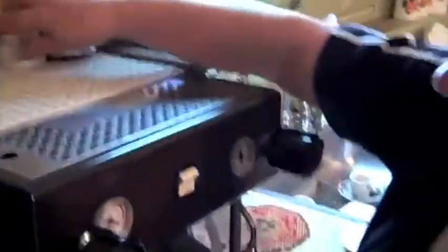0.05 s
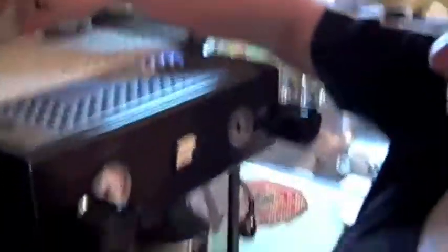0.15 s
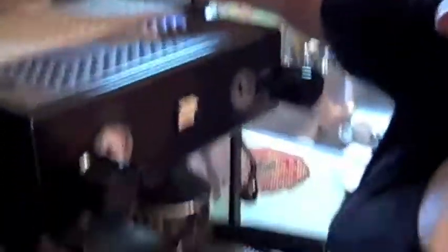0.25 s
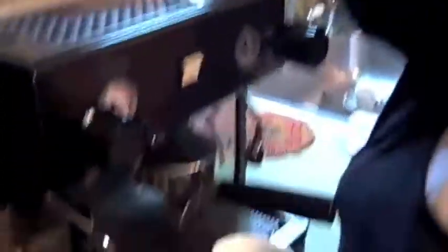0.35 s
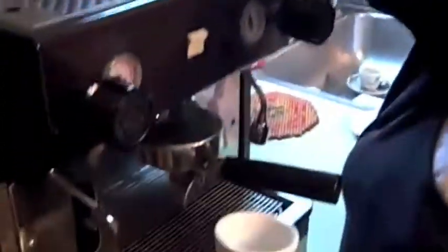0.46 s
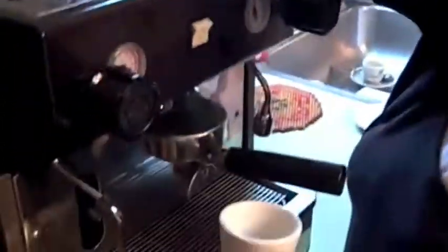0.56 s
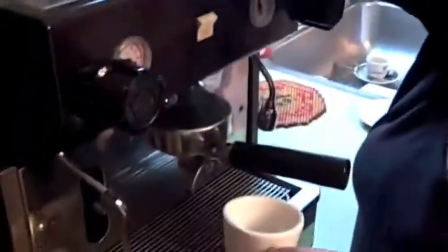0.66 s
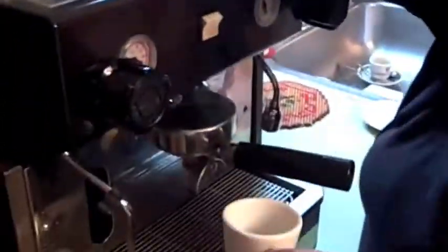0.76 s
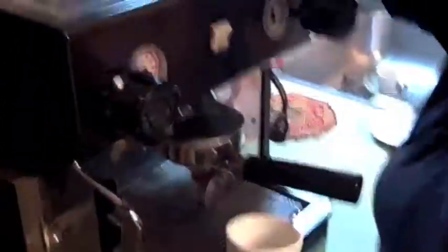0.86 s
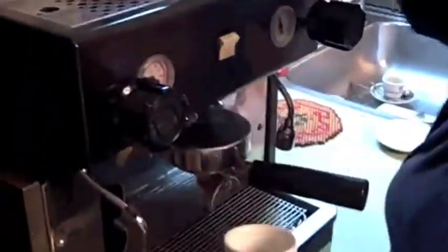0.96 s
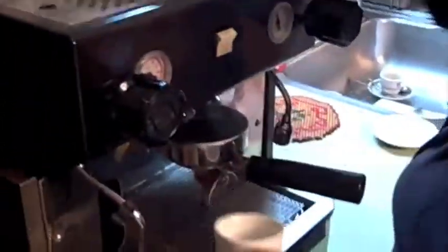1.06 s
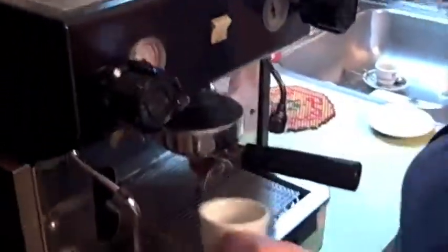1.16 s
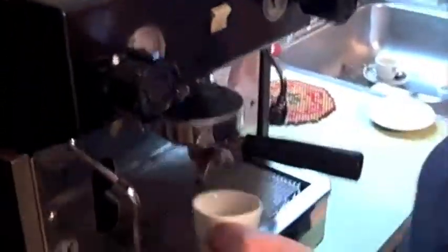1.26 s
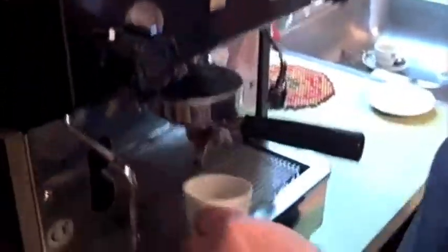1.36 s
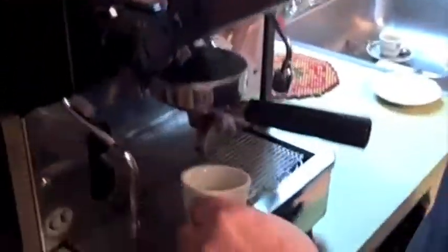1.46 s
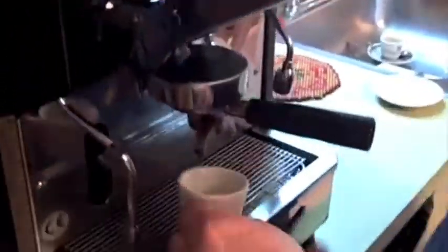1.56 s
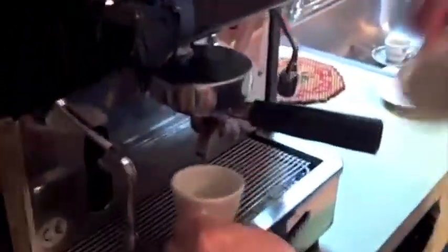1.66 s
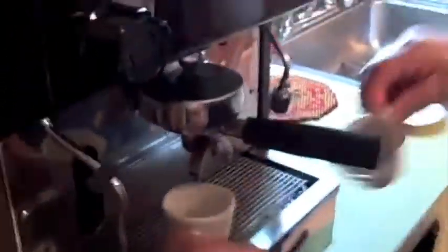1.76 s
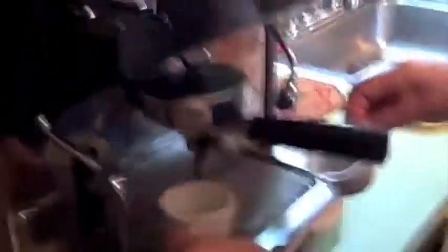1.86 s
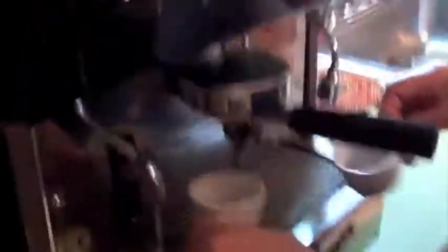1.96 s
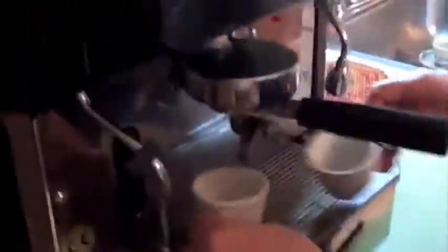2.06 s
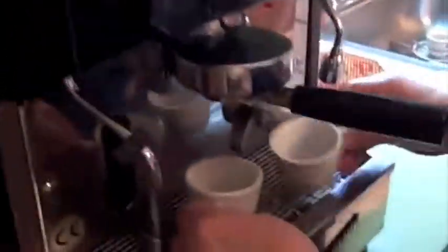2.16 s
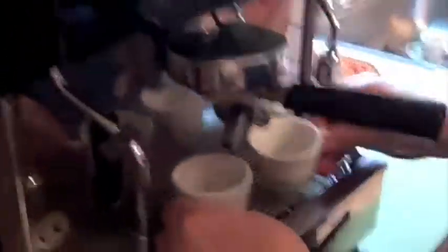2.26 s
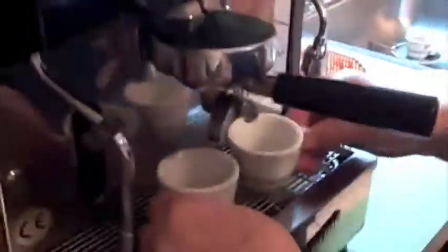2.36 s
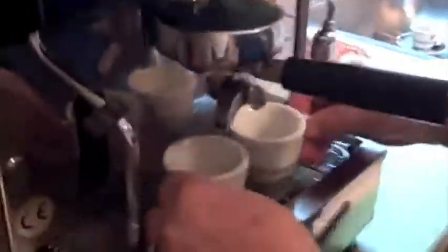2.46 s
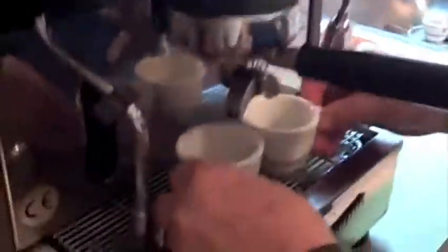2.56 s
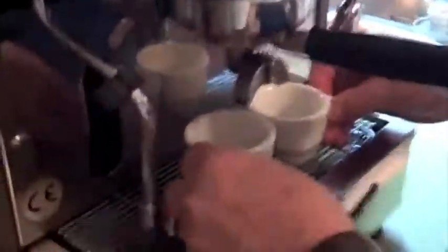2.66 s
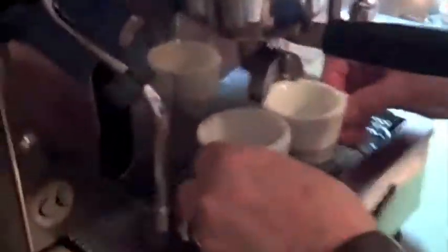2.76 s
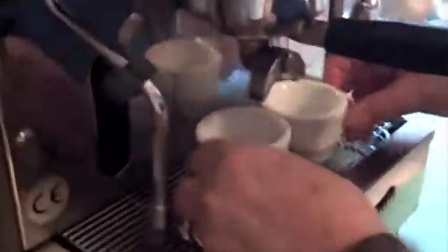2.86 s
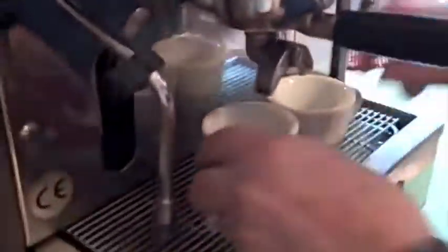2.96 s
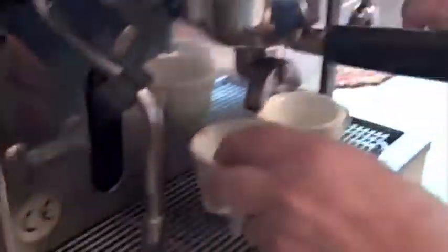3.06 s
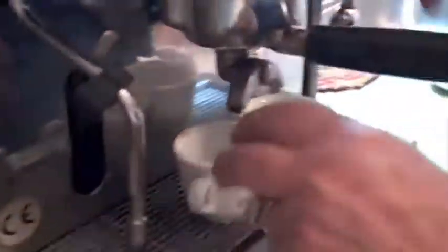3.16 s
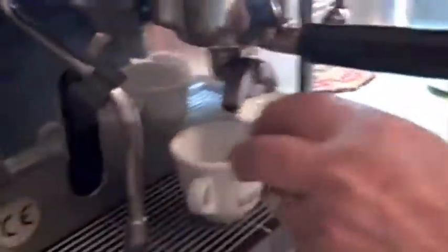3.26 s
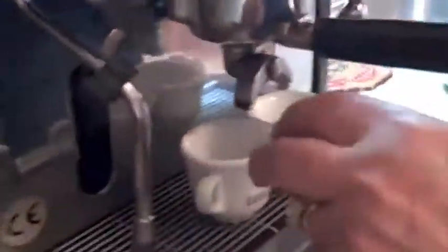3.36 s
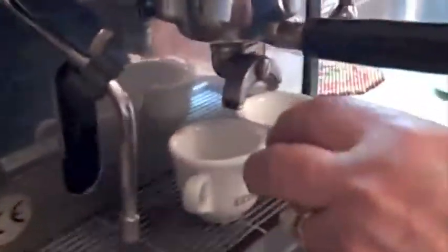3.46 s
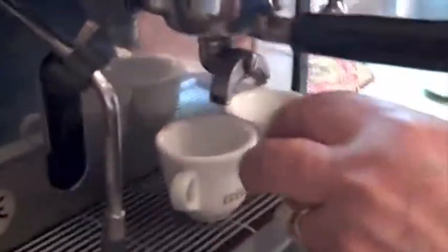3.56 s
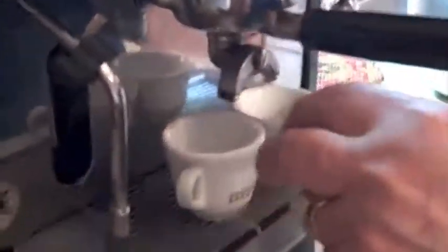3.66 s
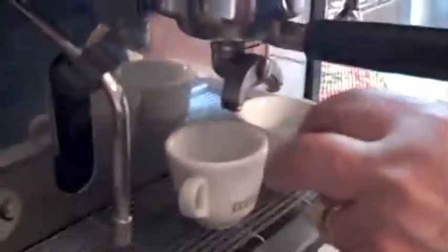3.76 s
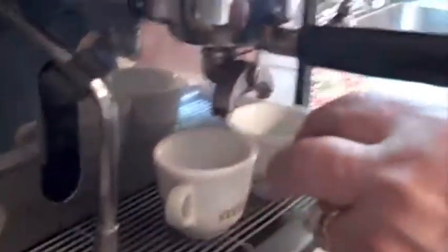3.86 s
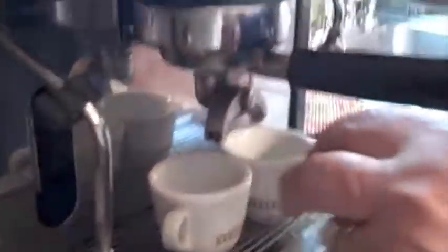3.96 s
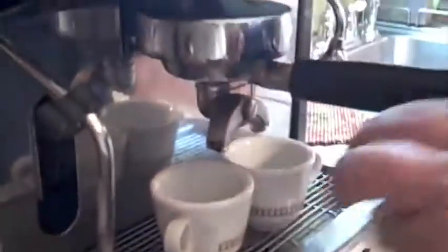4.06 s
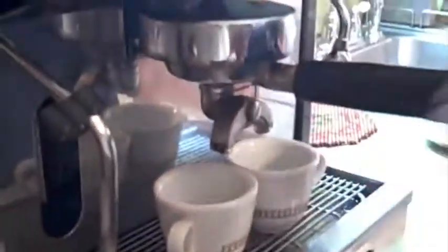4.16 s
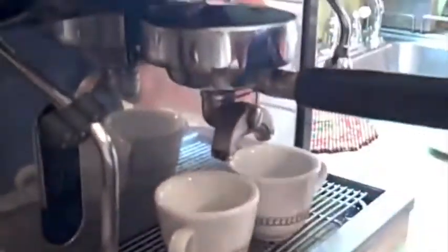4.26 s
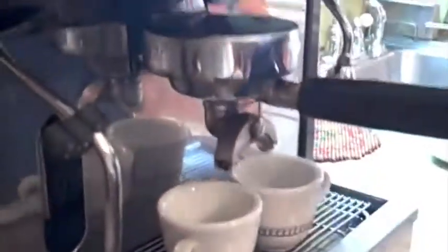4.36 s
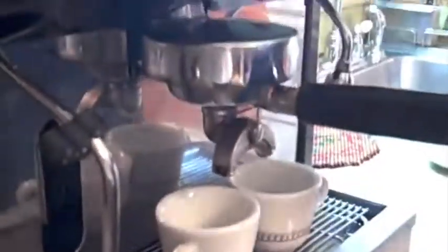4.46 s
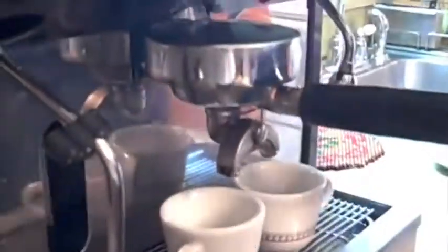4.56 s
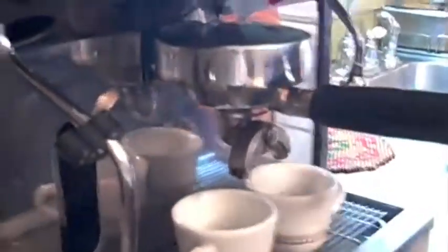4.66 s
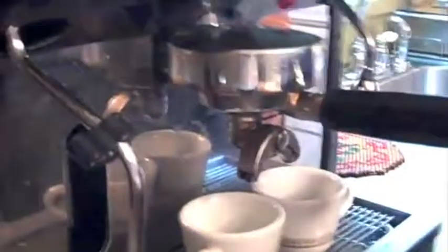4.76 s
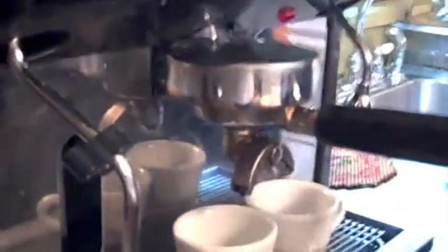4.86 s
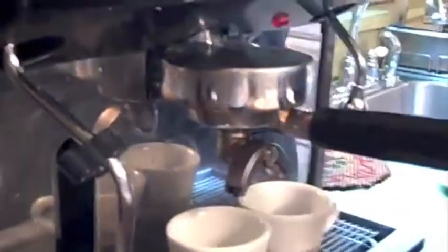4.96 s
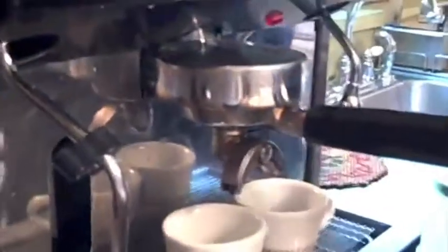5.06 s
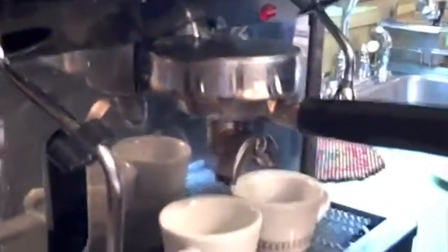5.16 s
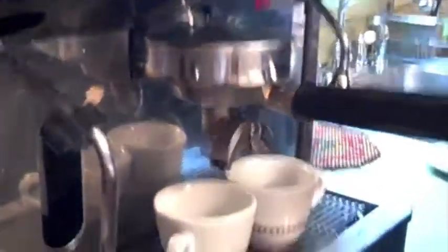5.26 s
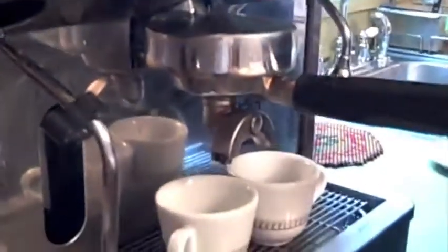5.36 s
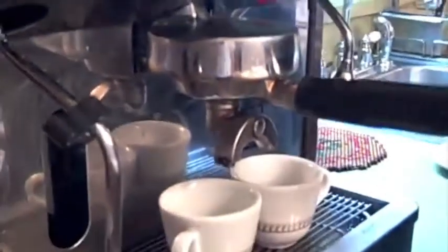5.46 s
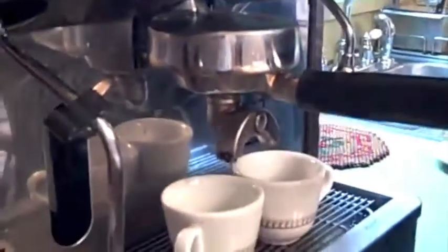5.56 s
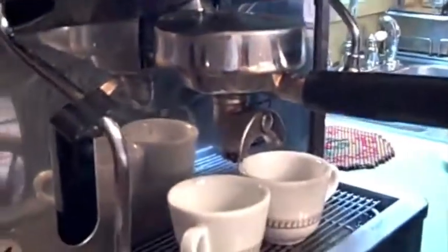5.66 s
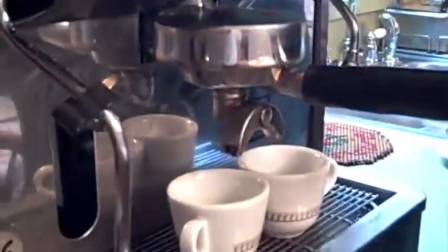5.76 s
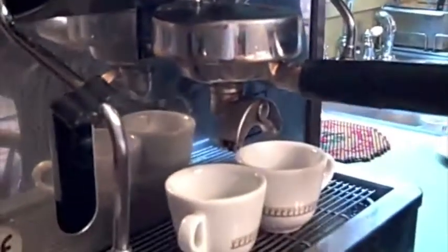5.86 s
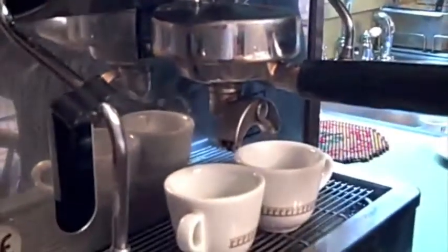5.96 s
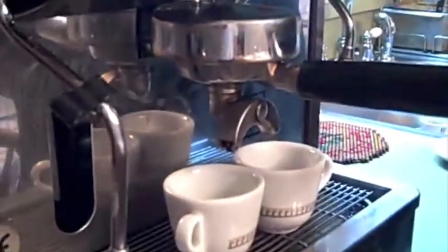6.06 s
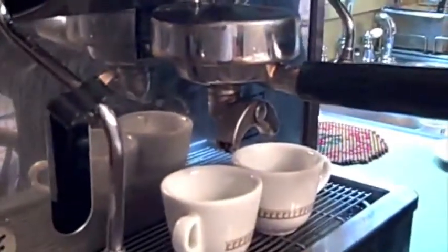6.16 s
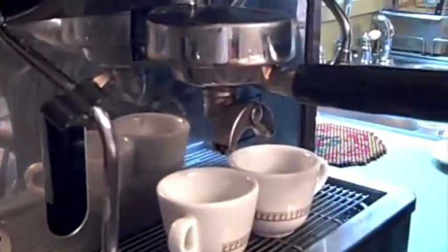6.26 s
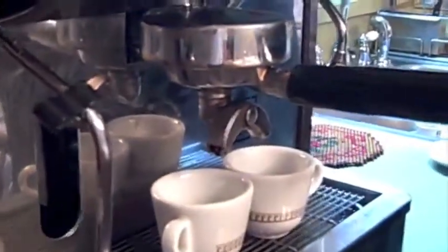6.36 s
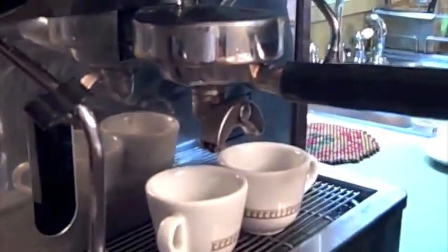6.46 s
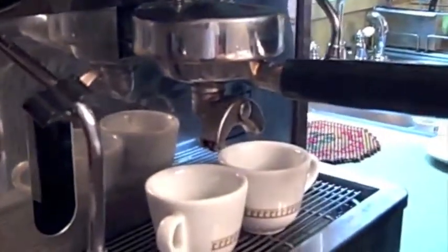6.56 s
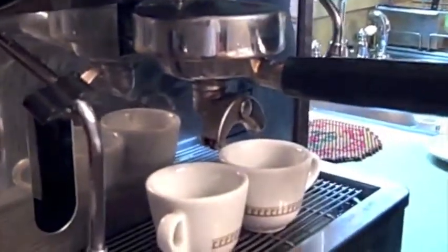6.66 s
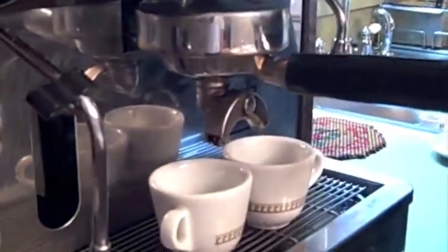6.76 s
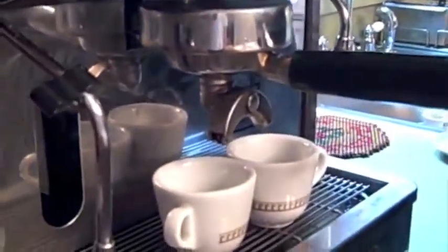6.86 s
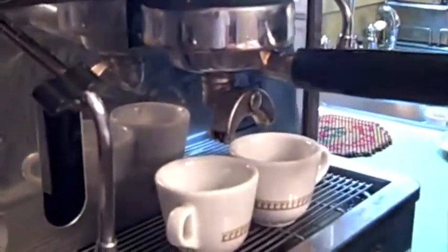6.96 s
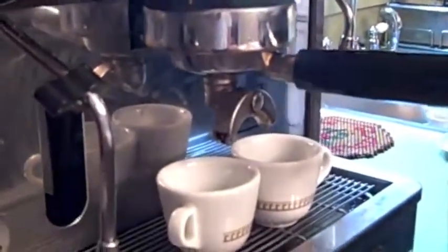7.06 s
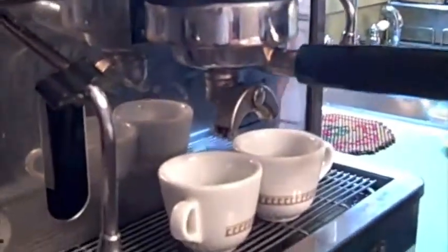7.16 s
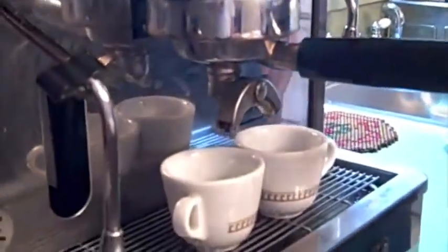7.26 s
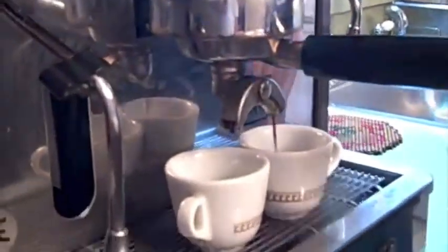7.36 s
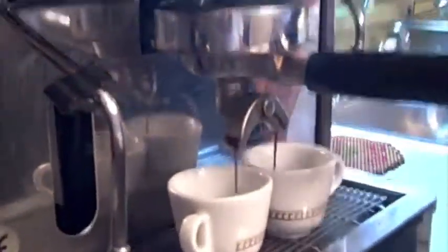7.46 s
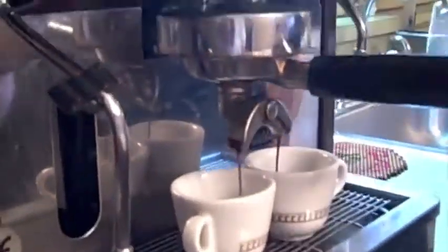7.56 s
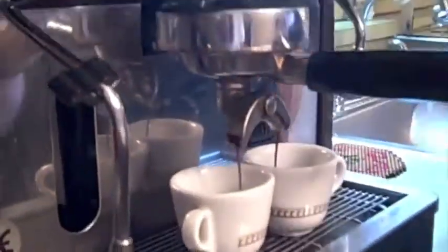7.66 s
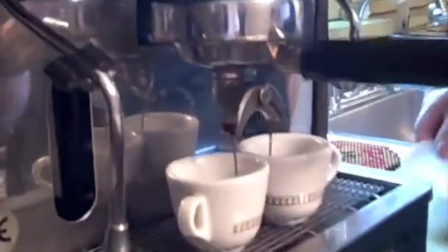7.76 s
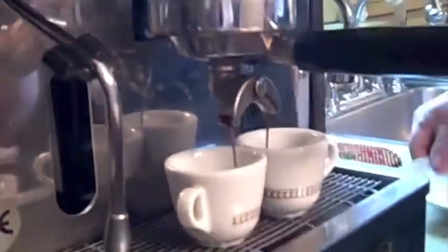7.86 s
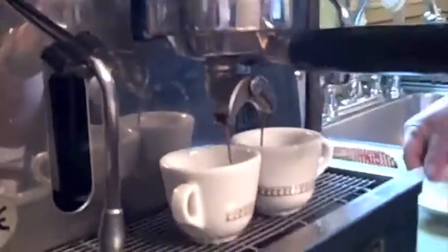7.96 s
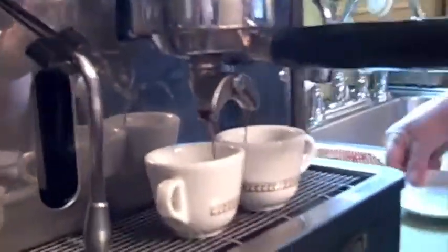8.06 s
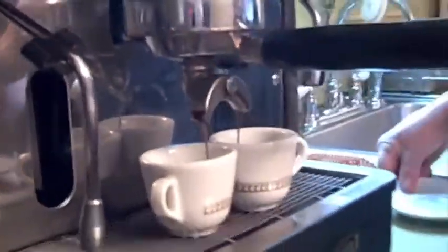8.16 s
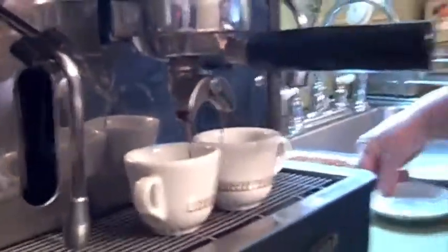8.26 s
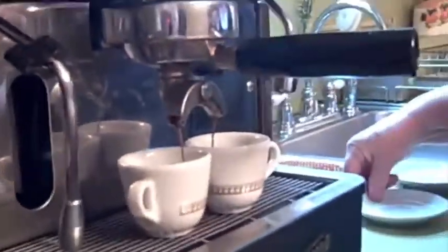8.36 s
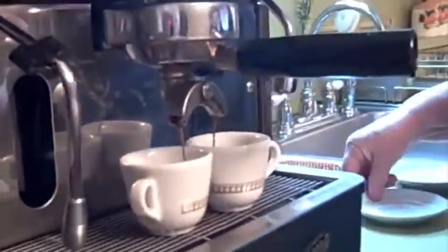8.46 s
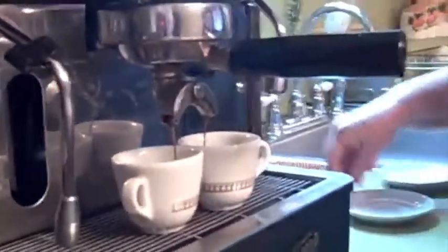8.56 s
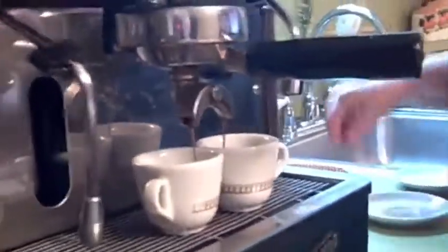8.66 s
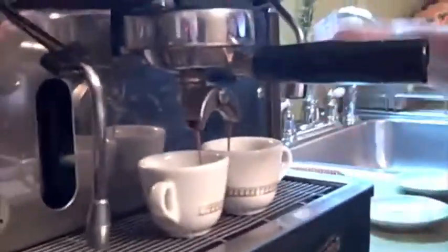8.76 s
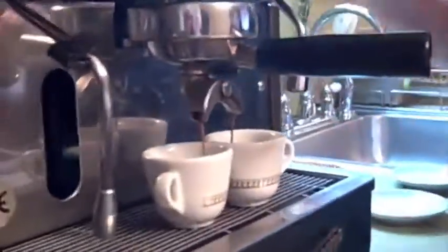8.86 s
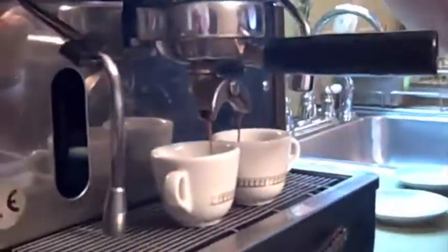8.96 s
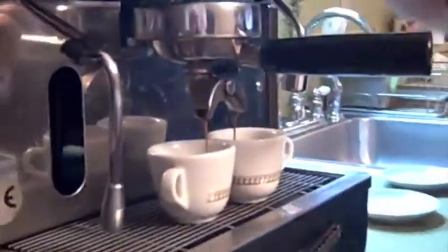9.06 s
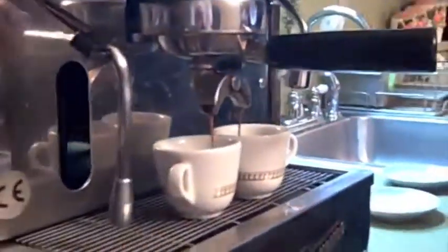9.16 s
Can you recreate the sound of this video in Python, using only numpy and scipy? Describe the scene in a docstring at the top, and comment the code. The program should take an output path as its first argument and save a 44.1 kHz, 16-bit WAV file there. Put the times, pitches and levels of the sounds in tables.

```python
"""Espresso machine and cups in a small kitchen

Close to a hand-held camera, two cups clink and scrape onto a steel drip tray: struck modes and rubbing noise.
A valve clacks open and a vane pump hums in harmonics of its vane rate while filtered noise hisses in as water.
The valve squeals and slams, the pump labours on against the coffee with a throbbing hiss, and two saucers
land on the counter. The camera's gain control ducks on sharp, bright blows, so the pump swells back after them."""
import sys
import numpy as np
from scipy import signal
from scipy.fft import rfft, irfft, next_fast_len
from scipy.io import wavfile
from scipy.ndimage import uniform_filter1d, minimum_filter1d

SR = 44100
rng = np.random.default_rng(int(sys.argv[2]) if len(sys.argv) > 2 else 0)


def unload_audio(sound):
    """Save the sound as a 16-bit wav file, at the path given as the first command line argument."""
    columns = np.transpose(np.atleast_2d(sound))
    # keep every value between -1 and 1, then stretch to whole-number steps
    steps = np.round(np.clip(columns, -1, 1) * 32767)
    wavfile.write(sys.argv[1], SR, steps.astype(np.int16))


N = 407043
T = np.arange(N) / SR
RING = SR * 3 // 4  # longest ring of a struck object, samples

# Levels are those at the microphone, ahead of the camera's gain control.
# A fade_s is the time to die by 60 dB; for blows it holds at 1 kHz.

# hum of the pump: multiple of the vane rate, level_db
VANE_ORDERS = [(1, -26), (2, -20), (3, -11), (4, 1.5), (5, -7.5), (6, -8), (7, -12.5), (8, -22), (9, -13.5),
               (10, -14.5), (12, -22), (13, -18)]
# the hum's overtones swell and fade as the microphone moves through standing waves:
# multiple of the vane rate -> time_s, level_db
STANDING_WAVES = {5: [(4.0, -2), (4.4, -6), (5.05, 5.5), (5.9, -3), (6.35, -2), (6.7, 7.5), (7.3, 1),
                  (7.9, 0), (8.7, -18), (9.2, -20)], 6: [(4.0, 0.5), (5.0, -1), (5.5, -14), (5.8, 7.5),
                  (6.15, -6), (6.7, 3), (7.4, 2), (9.2, 0.5)], 7: [(4.1, 5), (4.8, 3.5), (5.8, -13),
                  (6.7, 6), (7.3, 4), (7.9, -11), (9.2, 2)]}
# steady buzz of the motor: pitch_hz, level_db
MOTOR_LINES = [(118.5, -62.5), (1176, -57)]
# tone of the churning water and the rattle: frequency_hz, level_db
CHURN_COLOUR = [(60, -25), (270, -15), (350, -1), (430, 9.5), (520, -1.5), (650, 4.5), (850, 3),
                (1100, -2.5), (1500, -4.5), (2300, -8.5), (3200, -10), (6000, -29)]
# how hard the pump works, most while it fills the empty pipes: time_s, effort_db
EFFORT = [(4.05, 8.5), (4.35, 5.5), (4.72, 0.5), (5.0, -1), (5.5, 0.5), (5.9, -2), (6.4, -0.5), (7.3, 0.5),
          (9.23, -1.1)]
# pump shaft (turns per second): running free, slowed by the coffee, shortfall at switch-on
FREE_HZ, LOADED_HZ, START_LAG_HZ = 27.88, 27.52, .55
SPIN_UP_S, LOAD_UP_S = .2, .24  # time constant of the start, length of the slowing
VALVE_OPENS_S, VALVE_SHUTS_S, PRESSURE_UP_S = 3.868, 6.46, 7.0
# each layer's level at effort 0 (dB), and the dB it gains per dB of effort
HUM_DB, HUM_FOLLOW = -40.5, 1
CHURN_DB, CHURN_FOLLOW = -42.5, 0.77
FILL_DB, FILL_FOLLOW = -38, 0.57
BYPASS_DB, BYPASS_FOLLOW = -42, 0.71

# tone of the bypass hiss: frequency_hz, level_db
BYPASS_COLOUR = [(1180, -19), (2000, 1.5), (2350, 0.5), (2700, 0), (2950, -10), (4200, 3), (5450, 1.5),
                 (6200, 0.5), (6800, -6), (7400, -8.5), (9500, -2), (11500, -8.5), (12600, -6),
                 (15500, -11.5)]
# resonances of the bypass hiss: centre_hz, width_hz, level_db
BYPASS_PEAKS = [(4440, 400, 4.5), (5940, 200, 7), (6350, 170, 5), (8750, 180, -4), (9340, 520, 1.5),
                (12800, 230, -7)]
# the strongest band of the bypass hiss sinks: time_s, centre_hz
BYPASS_CENTRE = [(6.5, 5050), (7.4, 5050), (8.1, 4850), (8.7, 4450), (9.2, 4350)]
BYPASS_BAND_HZ, BYPASS_BAND_DB = 450, -12  # its width, and its level beside the hiss

# tone of the filling jet: frequency_hz, level_db
FILL_COLOUR = [(880, -20.5), (1500, -3.5), (1750, -7), (2590, -4.5), (2800, -6), (5610, -2), (7160, -9),
               (7900, -7.5), (9510, -7.5), (10400, 1.5), (11400, -7.5), (12600, -4), (15500, -7.5)]
# narrow bores that whistle: centre_hz, width_hz, level_db
FILL_PEAKS = [(2630, 11.4, 6), (7780, 160, -5), (10190, 80, 7.5), (12600, 520, -8.5)]
# the jet spurts as the valve opens and again as it narrows: peak_s, rise_s, fall_s, level_db
SPURTS = [(3.96, 0.072, 0.093, -21), (6.25, 0.46, 0.12, -32.5)]
PANEL_CHANGE_S = .9  # time for one pattern of panel reflections to fade into the next

# water squeezing through the valve: start_s, end_s, first_hz, last_hz, width_hz, level_db
SQUEALS = [(4.03, 4.45, 2180, 2450, 200, -46), (5.879, 6.038, 1714, 1860, 479, -36),
           (5.961, 6.19, 9900, 14700, 2400, -38), (6.1, 6.346, 5540, 5770, 910, -38),
           (6.25, 6.473, 6600, 6120, 795, -41), (6.336, 6.474, 2970, 2980, 557, -35.5)]
# the solenoid valve opens: start_s, level_db, fade_s
CLACKS = [(3.8603, -6.5, 0.11), (3.8665, -7, 0.087), (3.872, -8.5, 0.075)]
# tone of the opening clack: frequency_hz, level_db
CLACK_COLOUR = [(24, -20), (40, -20), (136, -20), (535, 1), (817, -12), (903, -1), (998, -3), (1680, -0.5),
                (1820, -10), (2450, -3.5), (4570, -4), (5440, -3), (7520, -14.5), (11800, -5),
                (15500, -15.5)]
# the valve chatters and slams as pressure builds: start_s, level_db, fade_s
SLAMS = [(5.8255, -20, 0.18), (6.118, -22.5, 0.18), (6.3575, -24.5, 0.78), (6.447, -25.5, 0.17),
         (6.4587, -12.5, 0.041), (6.462, -11.5, 0.041), (6.467, -15.5, 0.23)]
# tone of the slams: frequency_hz, level_db
SLAM_COLOUR = [(59, -39), (100, -26), (614, -11.5), (758, -14.5), (1520, -6.5), (2180, -6), (2850, 0.5),
               (3460, -9.5), (5280, -14), (6000, -3.5), (8230, -26.5), (9540, -8), (11100, -28),
               (12600, -14), (15500, -30.5)]
# clear modes of the slammed valve: pitch_hz, level_db, fade_s
VALVE_MODES = [(2806, 3, 0.13), (2750, 3, 0.06), (2993, -11, 0.1), (3040, 1.5, 0.16), (5760, 7.5, 0.047),
               (8950, -4, 0.15)]
# water hammer in the pipes: start_s, level_db, fade_s
THUMPS = [(3.868, -16, 0.029), (6.461, -23.5, 0.014)]
# the brew button is pressed: start_s, level_db
PRESSES = [(3.7435, -43.5)]
# tinks of the button's spring: pitch_hz, level_db, fade_s
BUTTON_MODES = [(2620, -5, 0.076), (2680, 0, .03), (4100, -7, 0.052), (4930, -2, .025), (5400, -7, .035),
                (9100, -3, 0.023)]

# saucers landing and rocking on the counter: start_s, level_db, fade_s
SAUCERS = [(8.1345, -16, 0.053), (8.1768, -22.5, 0.19), (8.1928, -28, 0.2), (8.4262, -23.5, 0.22),
           (8.439, -21, 0.071), (8.4467, -14, 0.22), (8.4586, -17.5, 0.12), (8.466, -22, 0.16)]
# tone of the saucer blows: frequency_hz, level_db
SAUCER_COLOUR = [(180, -39), (300, -24.5), (428, -17), (884, -5), (1030, -1.5), (1200, -3), (1490, 0),
                 (1830, -3), (2030, -12), (2600, -6.5), (3130, -10), (5810, -19.5), (6780, -26.5),
                 (12000, -39), (15600, -72)]
# clear modes of the saucers: pitch_hz, level_db, fade_s
SAUCER_MODES = [(908, -7, 0.31), (1020, 0.5, 0.23), (1084, -2, 0.057), (1300, 2, 0.14), (1373, 2, 0.14),
                (1465, 7, 0.089), (1880, 0.5, 0.12), (2500, 2, 0.1), (2544, 0.5, 0.1)]
# a cup bumping the tray: start_s, level_db, fade_s
TRAY_KNOCKS = [(1.7785, -23, 0.21), (1.817, -33, 0.45)]
# tone of the tray knocks: frequency_hz, level_db
TRAY_COLOUR = [(90, -39.5), (223, -11), (340, -8), (370, -8), (601, -7), (742, -2.5), (861, -10), (936, -2),
               (2220, -7), (5630, -22), (6390, -37), (7100, -22), (15500, -29.5)]
# clear modes of the tray: pitch_hz, level_db, fade_s
TRAY_MODES = [(377, -11, 0.39), (484, -8.5, 0.67), (560, -8.5, 0.62), (684, -2, .19), (728, -1, 0.31),
              (940, -17, 0.28), (1066, 2, .18), (1696, -10, 0.4), (2062, -4, 0.22), (2239, -1.5, 0.18)]
# the dry clack of one cup against the other: start_s, level_db, fade_s
CUP_CLACKS = [(2.7065, -24, 0.23)]
# tone of the cup clack: frequency_hz, level_db
CUP_COLOUR = [(200, -23.5), (420, -6.5), (900, -8.5), (1650, 4), (3000, -6), (7000, -6.5), (9500, -13),
              (15500, -20)]
# clear modes of the clacking cups: pitch_hz, level_db, fade_s
CUP_MODES = [(415, -8.5, 0.46), (1274, -3, 0.144), (1416, -12.5, 0.17), (1610, -4, 0.21), (1750, 0, 0.2),
             (1960, -3, .18), (2360, -3.5, .18), (2929, -4, 0.16)]
# china touching china or steel: start_s, left_cup_db, right_cup_db
CLINKS = [(1.78, -60, -28.5), (2.707, -17, -30.5)]
# high modes of the left cup: pitch_hz, level_db, fade_s
LEFT_CUP = [(5970, -2.5, 0.11), (6260, 3, 0.06), (6520, 2, 0.1), (6760, -3, .09), (6460, -1.5, 0.07),
            (8170, -7, 0.043)]
# modes of the right cup: pitch_hz, level_db, fade_s
RIGHT_CUP = [(2250, 4.5, 0.038), (6600, -13, 0.21), (6240, 12.5, 0.12)]

# shoves of a cup over the tray grid: fastest_s, rise_s, fall_s, level_db
SHOVES = [(2.223, 0.006, 0.18, -27), (2.278, 0.032, 0.11, -30), (2.425, 0.12, 0.073, -40.5),
          (2.565, 0.19, 0.22, -45.5), (2.69, 0.064, 0.16, -45)]
# tone of the scrape: frequency_hz, level_db
SLIDE_COLOUR = [(120, -52.5), (212, -9), (250, -25.5), (340, -19.5), (398, -4), (575, -11.5), (733, -7.5),
                (1020, -13), (1620, -10), (2540, -15.5), (5060, -17), (6730, -22), (11000, -19.5),
                (15500, -31)]
# low resonances of the grid: centre_hz, width_hz, level_db
GRID_PEAKS = [(427, 50, 3.5), (635, 35, 3), (727, 35, 8), (1240, 45, 4), (1420, 120, -3), (1660, 130, -5),
              (2030, 90, -4.5), (3030, 130, -5.5)]
# the cup's foot sings as it crosses the bars: centre_hz, width_hz, level_db
FOOT_PEAKS = [(3350, 350, -1), (4250, 460, 2.5), (5210, 280, 1)]
FOOT_DB, FOOT_DRIFT = -10.5, .025  # level beside the scrape; drift as a share of the pitch
GRAIN_DB, CATCH_DB = 1.9, 1.1  # unevenness of rubbing: fine grain and coarser catches
# thin squeaks of china dragged over steel: start_s, end_s, first_hz, last_hz, width_hz, level_db
SQUEAKS = [(.40, .63, 5900, 6070, 71.8, -57.5), (.42, .51, 1710, 1680, 41, -47.5)]

# sleeve and hand brushing past: fastest_s, rise_s, fall_s, level_db, treble_db
STROKES = [(.03, 0.4, 0.14, -45.5, -65), (0.166, 0.03, 0.03, -47.5, -65), (.335, 0.16, 0.48, -44, -46),
           (.45, 0.2, 0.19, -38.5, -47.5), (.95, 0.19, 0.15, -49.5, -51.5), (1.1, 0.21, 0.14, -51, -80),
           (1.61, .1, .3, -57.5, -66)]
# tone of the cloth: frequency_hz, level_db
SLEEVE_COLOUR = [(120, -45.5), (215, -4.5), (300, -5.5), (403, -13), (640, -3), (1550, -5), (1690, -3.5),
                 (3930, -6.5), (6120, -10.5), (7410, -14.5), (9150, -13), (15500, -23)]
# dry ticks of fingers, grip and handle: start_s, peak_db, centre_hz, decay_s (of the contact)
TICKS = [(0.053, -31.5, 2120, .0012), (0.9875, -33, 1880, .0006), (1.008, -36, 2500, .0005),
         (1.022, -33.5, 4500, .0006), (1.0495, -35, 3500, .0008), (1.075, -34, 2500, .0006),
         (1.0975, -34, 2800, 0.0007), (1.3725, -41.5, 2800, 0.0013), (1.428, -42, 2800, 0.0009),
         (1.4705, -42.5, 2800, .001), (1.52, -41, 2600, .001), (1.575, -37, 2260, .0012),
         (1.594, -34, 2240, .0009), (1.738, -40.5, 1220, .0012), (1.955, -31, 1800, .001),
         (2.599, -17.5, 10000, 0.00065), (2.8878, -26.5, 2090, 0.00092), (2.985, -39.5, 9900, 0.0092),
         (3.714, -34, 1090, 0.00096), (3.809, -34.5, 8590, 0.0016)]
TICK_RING_S, TICK_RING_DB = 0.013, -21  # decay and level of a tick's after-ring
# soft, very low bumps: start_s, level_db, fade_s
BUMPS = [(2.599, -45, .3), (2.71, -39, .5), (3.115, -46, .3), (3.18, -44, 0.54)]
# tone of the low bumps: frequency_hz, level_db
BUMP_COLOUR = [(8, 5), (30, -20), (100, -24), (250, -36.5), (1000, -75.5)]
# soft knocks further off in the kitchen: start_s, level_db, fade_s
FAR_KNOCKS = [(.825, -44, 0.4), (1.335, -52, 0.32), (3.116, -51.5, 0.33), (3.407, -53, 0.24),
              (3.458, -49, 0.16)]
# tone of the far knocks: frequency_hz, level_db
FAR_COLOUR = [(200, -21), (450, -14.5), (700, -2), (1600, -5.5), (3000, -9), (12000, -28)]
# tone of the room air: frequency_hz, level_db
ROOM_COLOUR = [(18, -34), (30, 5), (53, -14.5), (277, -16), (622, -15), (1590, -15), (6890, -25.5),
               (11300, -26), (15500, -30.5)]
ROOM_DB = -63

# the camera's gain control: listens to the treble, ducks at once, waits, then climbs back in small steps
SENSE_HZ, SENSE_S, STEP_DB = 8200, .008, .5
LIMIT_DB, DUCK_SLOPE = -27.5, 0.74  # treble level where ducking starts; dB of duck per dB above it
HOLD_S, RECOVER_DB_PER_S = 0.38, 18
BIAS, BIAS_LEAK_HZ = 0.03, 1.5  # a standing offset turns each change of gain into a soft bump
TOP_HZ = 15300  # nothing much is heard above this


def pump(turns):
    """Four vanes drum out the hum; uneven parts rattle alike on every turn; water churns; the motor buzzes."""
    vane = 2 * np.pi * 4 * turns
    hum = 0
    for k, db in VANE_ORDERS:
        gain = undb(db + overtone_db(k) + 0.48 * walk(4.5))
        hum = hum + gain * np.sin(k * vane + 2 * np.pi * rng.random())
    hum = unit(hum)
    # one fixed stretch of noise, read through once a turn
    one_turn = irfft(np.exp(2j * np.pi * rng.random(SR // 55)))
    rattle = np.interp(turns % 1, np.linspace(0, 1, len(one_turn)), one_turn)
    rattle = unit(colour(rattle, CHURN_COLOUR))
    pulsing = noise() * (1 + .5 * np.cos(vane))
    churn = casing(colour(pulsing, CHURN_COLOUR), t60=0.067, echo_db=0.5)
    # under pressure the pump runs more evenly: less churning, clearer rattle
    loaded = gate(PRESSURE_UP_S, 10, 0.077)
    water = undb(-4.3 * loaded) * churn + undb(-8.5 + 4.8 * loaded) * rattle
    motor = sum(np.sqrt(2) * undb(db) * np.sin(2 * np.pi * hz * T) for hz, db in MOTOR_LINES)
    mix = driven(HUM_DB, HUM_FOLLOW) * hum + driven(CHURN_DB, CHURN_FOLLOW) * water + motor
    return mix * gate(VALVE_OPENS_S, 10, 0.19)


def shaft_turns():
    """The motor spins up, runs free, then slows once it has to push against the coffee."""
    lag = START_LAG_HZ * np.exp(-np.maximum(T - VALVE_OPENS_S, 0) / SPIN_UP_S)
    load = np.clip((T - VALVE_SHUTS_S) / LOAD_UP_S, 0, 1)
    return np.cumsum(FREE_HZ - lag + (LOADED_HZ - FREE_HZ) * load) / SR


def driven(db, follow):
    """Gain of a layer that follows the pump's effort."""
    return undb(db + follow * curve(EFFORT))


def overtone_db(k):
    """Swell of one overtone of the hum at the microphone."""
    return curve(STANDING_WAVES[k]) if k in STANDING_WAVES else 0


def bypass(turns):
    """The bypass spits once a turn and at each vane edge, and throbs as the vanes beat against the mains."""
    shaft = 2 * np.pi * turns
    beat = 2 * np.pi * 120 * T - 4 * shaft  # twice the mains frequency against the vane rate
    edges = 8 * shaft  # two edges a vane
    once_a_turn = 2.7 * np.cos(shaft) + .6 * np.cos(2 * shaft)
    spit = undb(once_a_turn + 1.3 * np.cos(beat) + 1.3 * np.cos(edges))
    hiss = unit(colour(noise(), BYPASS_COLOUR)) + undb(-9.0) * resonate(noise(), BYPASS_PEAKS)
    hiss = passing_panels(hiss, VALVE_SHUTS_S, t60=0.12, echo_db=7.0)
    sinking_band = whistle(curve(BYPASS_CENTRE), BYPASS_BAND_HZ)
    hiss = hiss + undb(BYPASS_BAND_DB) * sinking_band
    return hiss * unit(spit) * driven(BYPASS_DB, BYPASS_FOLLOW) * gate(VALVE_SHUTS_S, 10, .04)


def filling():
    """Water rushes through narrow bores that whistle faintly, until the valve shuts."""
    jet = colour(noise() * undb(walk(150) + .5 * walk(5.24)), FILL_COLOUR)
    jet = passing_panels(jet, VALVE_OPENS_S, t60=0.054, echo_db=1.5)
    bores = resonate(noise() * undb(walk(14.0)), FILL_PEAKS)
    flow = np.hypot(driven(FILL_DB, FILL_FOLLOW), swells(SPURTS))
    flow = flow * gate(VALVE_OPENS_S, VALVE_SHUTS_S + 0.015, 0.16)
    return (jet + undb(-4.5) * bores) * flow


def passing_panels(x, start, t60, echo_db):
    """As the microphone moves, one pattern of panel reflections fades into the next."""
    out = 0
    for s in np.arange(start, T[-1] + PANEL_CHANGE_S, PANEL_CHANGE_S):
        nearness = np.sqrt(np.maximum(1 - abs(T - s) / PANEL_CHANGE_S, 0))
        out = out + casing(x, t60, echo_db) * nearness
    return out


def casing(x, t60, echo_db):
    """Steel panels ring along and carve fine fixed peaks into a steady sound."""
    return unit(x + undb(echo_db) * signal.fftconvolve(x, tail(t60, 0))[:N])


def squeals(rows):
    """Rough, sputtering whistles of a squeezed jet or dragged china glide between two pitches."""
    out = np.zeros(N)
    for start, end, first_hz, last_hz, width_hz, db in rows:
        tone = whistle(np.interp(T, [start, end], [first_hz, last_hz]), width_hz)
        rough = unit(tone * undb(2.9 * walk(120)))
        out += undb(db) * gate(start, end, 0.03) * rough
    return out


def valve_clack():
    """The solenoid snaps the valve open: three dense metallic blows in quick succession."""
    return strike(CLACKS, CLACK_COLOUR, crack=0.07, damping=0.015)


def valve_slams():
    """The valve chatters on its seat and slams, ringing in its own clear modes."""
    return strike(SLAMS, SLAM_COLOUR, crack=0.057, damping=0.042, modes=VALVE_MODES, modes_db=-6.0)


def water_hammer():
    """Water checked in the pipes gives short thumps in the deep bass."""
    shape = [(20, -4.0), (70, 2), (125, -1), (300, 0.5), (1500, -61), (8000, -84)]
    return strike(THUMPS, shape, crack=0.28, damping=0.037)


def brew_button():
    """The spring of the pressed brew button tinks in short high modes."""
    out = np.zeros(N)
    for s, db in PRESSES:
        add(out, s, undb(db) * ring(BUTTON_MODES))
    return out


def saucers():
    """Saucers land and rock on the counter, each contact exciting china modes and a dense ring."""
    return strike(SAUCERS, SAUCER_COLOUR, crack=1.0, damping=0.51, modes=SAUCER_MODES, modes_db=-4.5)


def tray_knocks():
    """A cup bumps the steel tray, whose plate modes ring under a dense body."""
    return strike(TRAY_KNOCKS, TRAY_COLOUR, crack=0.16, damping=0.29, modes=TRAY_MODES, modes_db=-5.0)


def cup_clacks():
    """One cup knocks the other: a dry crack with short china modes."""
    return strike(CUP_CLACKS, CUP_COLOUR, crack=.2, damping=.1, modes=CUP_MODES, modes_db=-7.5)


def clinks():
    """Each thick little cup pings in a few quickly dying modes, some close enough to beat."""
    out = np.zeros(N)
    for s, left_db, right_db in CLINKS:
        add(out, s, undb(left_db) * ring(LEFT_CUP) + undb(right_db) * ring(RIGHT_CUP))
    return out


def slide():
    """The unglazed foot of a cup sticks and slips on the grid; the grid rings low, the foot sings high."""
    grip = undb(GRAIN_DB * walk(700) + CATCH_DB * walk(44.9))
    slips = noise() * grip
    scrape = casing(colour(slips, SLIDE_COLOUR), t60=0.13, echo_db=1.0)
    scrape = scrape + undb(-4.0) * resonate(slips, GRID_PEAKS)
    foot = 0
    for hz, width, db in FOOT_PEAKS:
        drifting_hz = hz * (1 + FOOT_DRIFT * walk(6))
        foot = foot + undb(db) * whistle(drifting_hz, width)
    return unit(scrape + undb(FOOT_DB) * unit(foot * grip)) * swells(SHOVES)


def sleeve():
    """Cloth fibres catch and let go: fine grains that swell with each stroke, some strokes brighter."""
    grains = noise() * undb(GRAIN_DB * walk(500) + CATCH_DB * walk(60.2))
    cloth = unit(colour(grains, SLEEVE_COLOUR))
    treble = signal.sosfilt(signal.butter(2, 6500, "high", fs=SR, output="sos"), cloth)
    body = signal.sosfilt(signal.butter(4, 6500, fs=SR, output="sos"), cloth)
    body_gain = swells((s, rise, fall, db) for s, rise, fall, db, _ in STROKES)
    treble_gain = swells((s, rise, fall, db) for s, rise, fall, _, db in STROKES)
    return body_gain * unit(body) + treble_gain * unit(treble)


def ticks():
    """Small dry contacts close to the microphone, alone or in creaking runs."""
    out = np.zeros(N)
    for s, peak_db, hz, decay_s in TICKS:
        add(out, s, undb(peak_db) * tick(hz, decay_s))
    return out


def tick(hz, decay_s):
    """A tiny contact: a noise burst with a fast decay and a faint slower after-ring; peak 1."""
    t = T[:RING // 10]
    decay = np.exp(-t / decay_s) + undb(TICK_RING_DB) * np.exp(-t / TICK_RING_S)
    burst = rng.standard_normal(len(t)) * decay
    sound = colour(burst, [(hz / 12, -20), (hz / 2, -3), (hz, 0), (hz * 2, -7), (hz * 6, -28)])
    return sound / abs(sound).max()


def low_bumps():
    """Soft, very low thuds: a contact impulse and a dense ring, almost all in the deep bass."""
    return strike(BUMPS, BUMP_COLOUR, crack=3.0, damping=0)


def far_knocks():
    """Knocks further off in the kitchen: dense rings without a contact crack."""
    return strike(FAR_KNOCKS, FAR_COLOUR, crack=0, damping=0.75)


def kitchen_echo(x):
    """Small hard walls return a dense tail that dies sooner in the treble."""
    return signal.fftconvolve(x, tail(0.4, 0.33))[:N]


def background():
    """Quiet room air: steady noise, strongest in the deep bass."""
    return undb(ROOM_DB) * unit(colour(noise(), ROOM_COLOUR))


def strike(blows, shape, crack, damping, modes=(), modes_db=0):
    """Each blow is a contact crack and a dense ring in the body's colour, plus its clear modes."""
    out = np.zeros(N)
    for s, db, t60 in blows:
        body = tail(t60, damping)
        body[0] += crack
        sound = punch(colour(body, shape))
        if len(modes):
            sound = punch(sound + undb(modes_db) * ring(modes))
        add(out, s, undb(db) * sound)
    return out


def ring(modes):
    """Decaying partials of a struck object."""
    t, out = T[:RING], 0
    for hz, db, t60 in modes:
        partial = np.sin(2 * np.pi * (hz * t + rng.random()))
        out = out + undb(db) * partial * np.exp(-np.log(1000) * t / t60)
    return punch(out)


def tail(t60, damping):
    """Countless close modes dying away, the high ones sooner if damped; energy 1."""
    t, out = T[:RING], 0
    spectrum = rfft(rng.standard_normal(RING))
    hz = np.arange(RING // 2 + 1) * SR / RING
    octave = np.clip(np.log2((hz + 1) / 1000), -3, 4)  # from 1 kHz
    for k in range(-3, 5):
        band = irfft(spectrum * np.maximum(1 - abs(octave - k), 0), RING)
        out = out + band * np.exp(-np.log(1000) * t / (t60 * 2 ** (-damping * k)))
    return unit(out) / np.sqrt(RING)


def punch(x):
    """Scale a blow so that its energy equals 10 ms at rms 1."""
    return x / np.sqrt(np.sum(x ** 2) / (SR / 100))


def add(out, s, x):
    """Mix a sound in at a time."""
    i = max(int(s * SR), 0)
    out[i:i + len(x)] += x[:N - i]


def whistle(hz, width_hz):
    """A narrow band of noise around a centre that may move."""
    phase = 2 * np.pi * np.cumsum(hz) / SR
    return unit(walk(width_hz) * np.cos(phase) + walk(width_hz) * np.sin(phase))


def colour(x, points):
    """Causal (minimum-phase) filter through (Hz, dB) points."""
    size = next_fast_len(len(x) + RING)
    hz, db = np.transpose(points)
    bin_hz = np.arange(size // 2 + 1) * SR / size
    log_gain = np.log(undb(np.interp(np.log(bin_hz + 1), np.log(hz), db)))
    # folding the cepstrum forward in time leaves no ring ahead of the blow
    cepstrum = irfft(log_gain, size)
    cepstrum[1:size // 2] *= 2
    cepstrum[size // 2 + 1:] = 0
    return irfft(rfft(x, size) * np.exp(rfft(cepstrum)), size)[:len(x)]


def resonate(x, peaks):
    """Pass a sound through (Hz, width Hz, dB) resonances."""
    out = 0
    for hz, width, db in peaks:
        b, a = signal.iirpeak(hz, max(hz / width, 2), SR)
        out = out + undb(db) * signal.lfilter(b, a, x)
    return unit(out)


def swell(peak_s, rise_s, fall_s, db):
    """Gain of one gesture: it grows by 20 dB over the rise and dies by 20 dB over the fall."""
    away = np.maximum((peak_s - T) / rise_s, (T - peak_s) / fall_s)
    return undb(db - 20 * np.minimum(away, 10))


def swells(rows):
    """Gain of several gestures, whose powers add."""
    return np.sqrt(sum(swell(*row) ** 2 for row in rows))


def gate(start, end, fade):
    """Open between two times, with sloping edges."""
    return np.clip((T - start) / fade, 0, 1) * np.clip((end - T) / fade, 0, 1)


def curve(rows):
    """(s, value) points joined by straight lines in time."""
    return np.interp(T, *np.transpose(rows))


def walk(rate):
    """Smooth random motion of rms 1, with a new target about rate times a second."""
    k = max(int(SR / rate), 2)
    steps = np.repeat(rng.standard_normal(N // k + 1), k)
    return unit(uniform_filter1d(steps, k)[:N])


def noise():
    """White noise for the whole scene."""
    return rng.standard_normal(N)


def unit(x):
    """Scale to rms 1."""
    return x / np.sqrt(np.mean(x ** 2))


def undb(db):
    """Decibels to gain."""
    return 10 ** (np.asarray(db) / 20)


def gain_control(x):
    """Gain that drops on a sharp, bright blow, holds and recovers."""
    treble = signal.sosfilt(signal.butter(4, SENSE_HZ, "high", fs=SR, output="sos"), x)
    power = abs(uniform_filter1d(treble ** 2, int(SENSE_S * SR)))
    level_db = 10 * np.log10(power + 1e-12)
    wanted_db = np.minimum(LIMIT_DB - level_db, 0) * DUCK_SLOPE
    half = int(HOLD_S * SR / 2)
    held_db = minimum_filter1d(wanted_db, 2 * half + 1, origin=half)
    # a running minimum against a rising line limits the speed of recovery
    climb_db = RECOVER_DB_PER_S * T
    gain_db = np.minimum.accumulate(held_db - climb_db) + climb_db
    stepped = undb(STEP_DB * np.round(gain_db / STEP_DB))
    return uniform_filter1d(stepped, size=128)


def scene():
    """Machine and crockery in a small hard kitchen, heard by one microphone."""
    turns = shaft_turns()
    machine = pump(turns) + bypass(turns) + filling() + squeals(SQUEALS)
    valve = valve_clack() + valve_slams() + brew_button()
    crockery = saucers() + tray_knocks() + cup_clacks() + clinks()
    blows = valve + crockery + far_knocks()
    rubbing = slide() + squeals(SQUEAKS) + sleeve()
    room = undb(-10) * kitchen_echo(blows) + background()
    mono = machine + blows + water_hammer() + rubbing + ticks() + low_bumps() + room
    return np.array([mono, mono])


def record(dry):
    """The camera rides the gain, which bumps its standing offset, and cuts the top."""
    gain = gain_control(dry[0])
    leak = signal.butter(1, BIAS_LEAK_HZ, "high", fs=SR, output="sos")
    bump = signal.sosfilt(leak, BIAS * (gain - 1))
    top_cut = signal.ellip(10, .2, 70, TOP_HZ, fs=SR, output="sos")
    return signal.sosfilt(top_cut, dry * gain + bump)


dry = scene()
out = record(dry)
unload_audio(out)
```